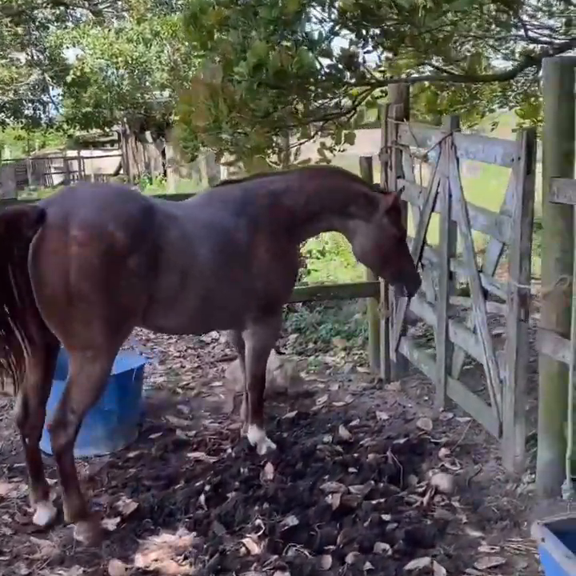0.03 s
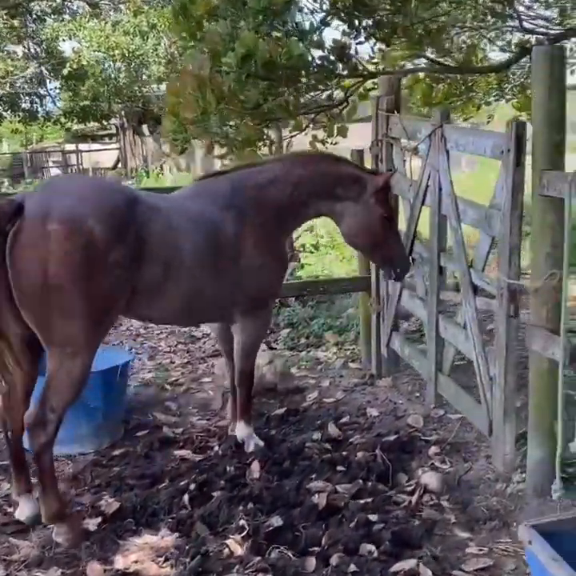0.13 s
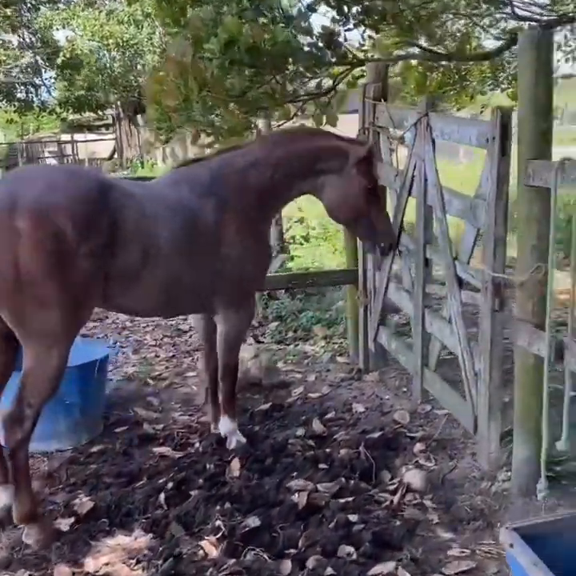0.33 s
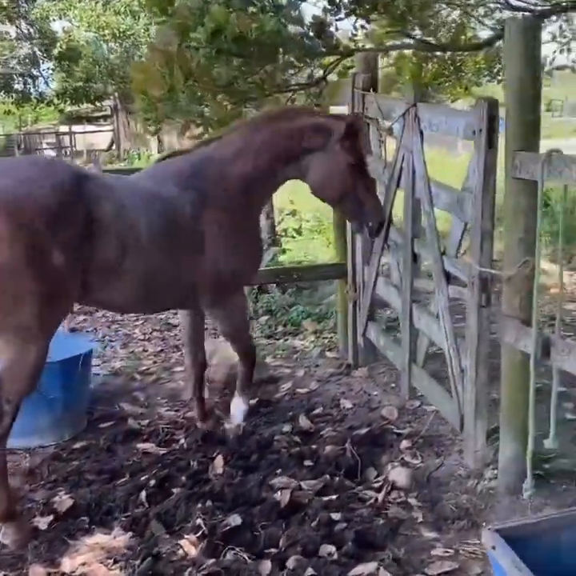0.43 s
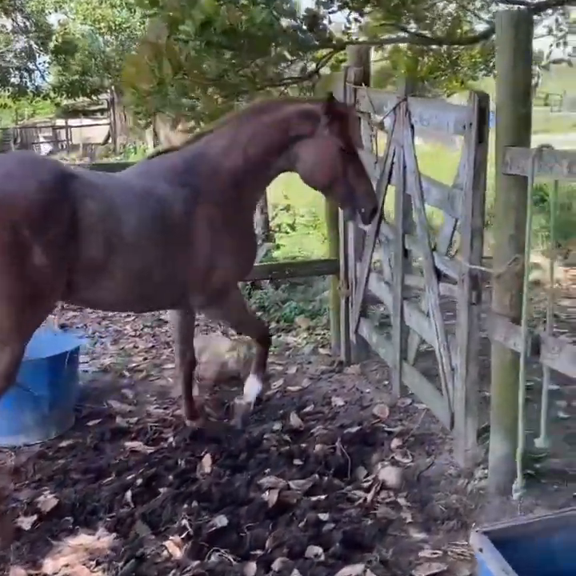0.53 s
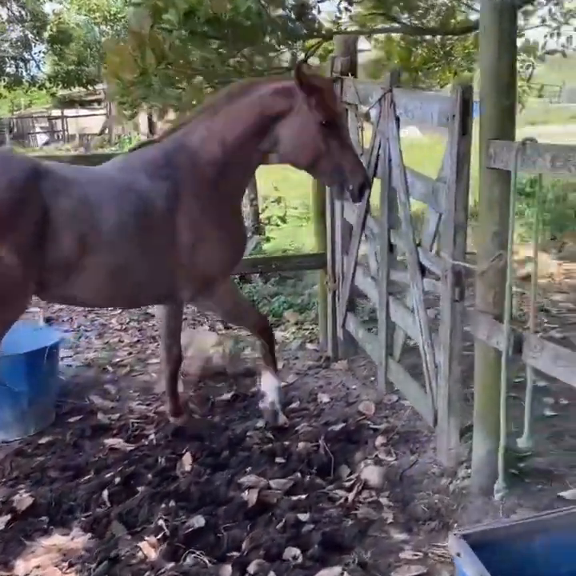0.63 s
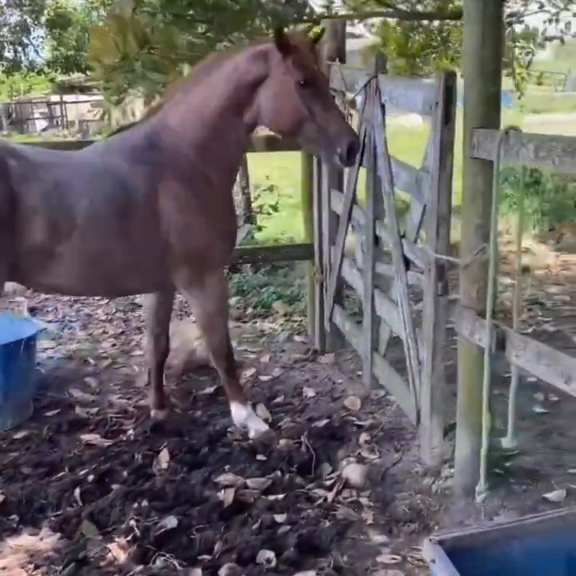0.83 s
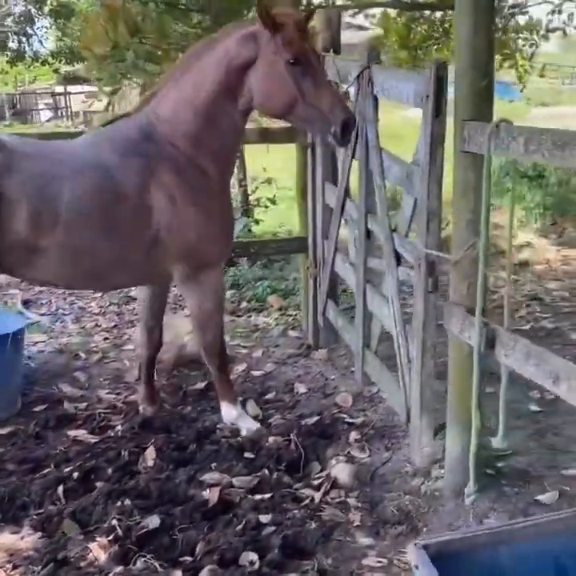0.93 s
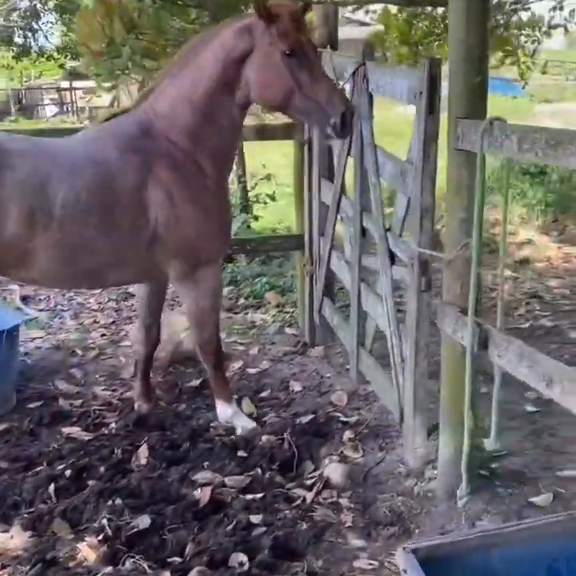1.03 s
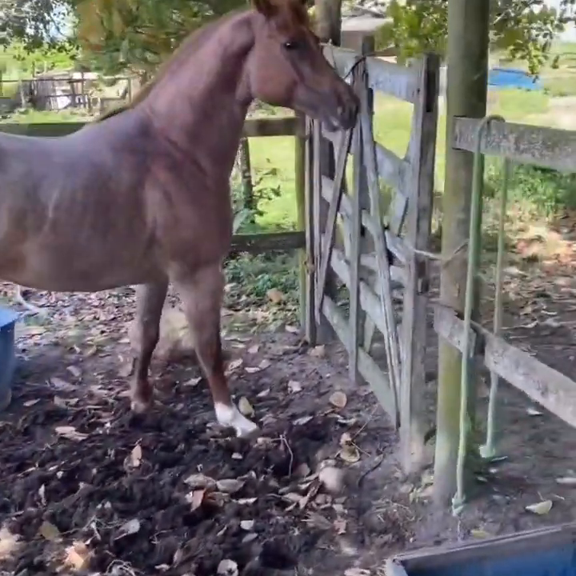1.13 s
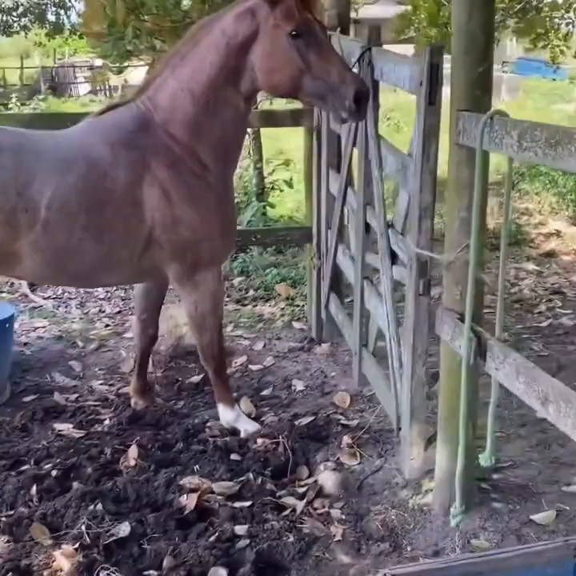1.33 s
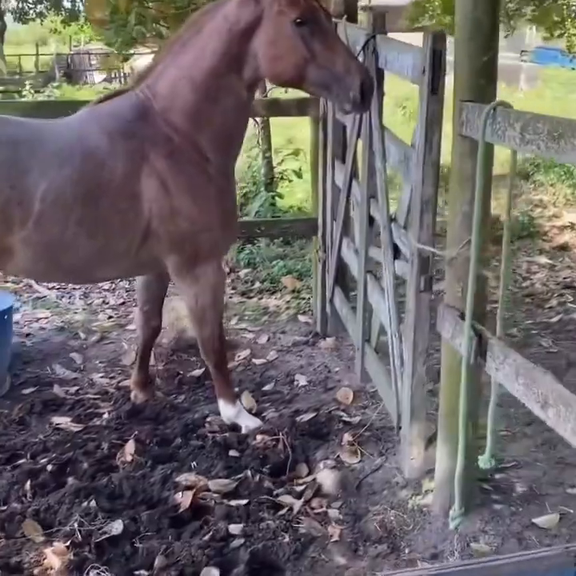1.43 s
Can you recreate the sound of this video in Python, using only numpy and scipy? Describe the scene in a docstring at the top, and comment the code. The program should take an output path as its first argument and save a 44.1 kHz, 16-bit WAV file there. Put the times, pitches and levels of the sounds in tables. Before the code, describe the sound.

A horse whinnies once close by, then steps on soft, leafy earth.

```python
"""A soft gust passes and a horse whinnies close by in a paddock, then steps on soft, leafy earth.
The call is a biphonation, a voice with two sources: a quavering low tone, and a whistle that climbs,
locks on the third harmonic and falls away as the call turns hoarse.
A wooden fence throws back short echoes; a light breeze rumbles underneath."""
import sys
import numpy as np
from scipy import signal
from scipy.fft import rfft, irfft
from scipy.io import wavfile
from scipy.ndimage import uniform_filter1d

SR = 44100
rng = np.random.default_rng(int(sys.argv[2]) if len(sys.argv) > 2 else 0)


def master(y):
    """Save y as 16-bit WAV."""
    cut = np.clip(np.atleast_2d(y).T, -1, 1)
    pcm = np.round(cut * 32767)  # scale
    wavfile.write(sys.argv[1], SR, pcm.astype(np.int16))


N = 66150
T = np.arange(N) / SR
VOICE_REF_DB, JITTER_HZ, OUTDOOR_WIDTH = -26, 205, 0.58

# Each row: time in seconds, low tone's pitch in Hz, relative levels of low tone and whistle in dB.
CALL = [(.115,430.8,-40,-71),(.14,477.4,-29.5,-32.5),(.19,482.9,-30.5,-36),(.235,535.3,-27.5,-21),(.3,481,-23,-32),(.337,535.8,-33,-18),(.38,543,-29.5,-17),(.405,494.6,-23,-22.5),(.43,482.7,-21.5,-22),(.45,545.7,-34,-24.5),(.515,560.3,-29,-22),(.535,495.4,-22,-27),(.585,518.6,-33,-29.5),(.635,511.2,-24,-23.5),(.66,464.6,-22.5,-38.5),(.683,478.7,-21.5,-37.5),(.7,475.5,-30,-37),(.72,491.3,-28,-22.5),(.752,479.7,-28,-33.5),(.78,437,-22,-36),(.805,369.9,-36.5,-45.5),(.83,392.4,-28.5,-27.5),(.855,451.9,-31,-57),(.895,443.4,-22,-43),(.922,385.7,-30.5,-28.5),(.955,243.7,-34.5,-80)]
# Each row: time in seconds, relative level of the overtones in dB.
OVERTONE_LEVELS = [(.11,-54),(.16,-27),(.24,-36.5),(.39,-30),(.49,-35.5),(.535,-28),(.64,-27),(.695,-32.5),(.73,-29),(.78,-32),(.84,-45),(.91,-34),(.96,-67)]


def from_db(db):
    """Decibels to amplitude ratio."""
    return 10 ** (np.asarray(db) / 20)


def curve(rows, column=1):
    """Linear interpolation of one column in time."""
    rows = np.array(rows)
    return np.interp(T, np.sort(rows[:, 0]), rows[:, column])


def envelope(rows, column=1, fade_s=0.0032):
    """Amplitude envelope from a dB column, with Gaussian fades outside its span."""
    outside = np.maximum(0, np.maximum(rows[0][0] - T, T - rows[-1][0]))
    return from_db(curve(rows, column)) * np.exp(-(2 * outside / fade_s) ** 2)


def gain_at(spectrum, hz):
    """Frequency response, interpolated in dB over log frequency."""
    freqs, db = np.transpose(spectrum)
    return from_db(np.interp(np.log(hz + 1), np.log(freqs), db))


def unit(x):
    """Normalisation to rms 1."""
    return x / np.sqrt(np.mean(x ** 2) + 1e-20)


def colour(x, spectrum):
    """Filtering by multiplication of spectra, normalised to rms 1."""
    hz = np.arange(N + 1) * SR / (2 * N)
    return unit(irfft(rfft(x, 2 * N) * gain_at(spectrum, hz))[..., :N])


def wobble(hz):
    """Random modulation: low-passed noise of rms 1."""
    return unit(signal.sosfilt(signal.butter(2, hz, fs=SR, output="sos"), rng.standard_normal(N)))


def pan(db):
    """Level difference of left over right, as two gains with a mean of 1."""
    gains = from_db(np.array([[db], [-db]]) / 2)
    return gains / gains.mean()


def noise(width):
    """Mid-side white noise; width is side over mid."""
    mid, side = rng.standard_normal((2, N))
    return mid + width * side * np.array([[1], [-1]])


def breeze(gust_s=0.046):
    """Wind noise: a steady rumble and hiss, with low gusts under Gaussian envelopes."""
    # Each row: time of the peak in seconds, level in dB.
    gusts = [(.008,-32),(.11,-40.5),(.42,-43)]
    # Each row of both: frequency in Hz, relative level in dB.
    gust_spectrum = [(25,-4.5),(60,14),(150,-12.5),(300,-53),(1000,-87.5)]
    steady_spectrum = [(25,-20.5),(60,-2),(180,-19.5),(350,-29.5),(1200,-30),(3000,-40.5),(7000,-50),(12500,-46)]
    swell = sum(from_db(db) * np.exp(-((T - peak) / gust_s) ** 2) for peak, db in gusts)
    rumble = swell * colour(noise(OUTDOOR_WIDTH), gust_spectrum)
    return rumble + from_db(-46) * colour(noise(OUTDOOR_WIDTH), steady_spectrum)


def fence(sound, onset_s=0.003, decay_s=0.0093):
    """Specular reflection off ground and gate; diffuse scattering of treble by boards and leaves."""
    # Each row: left and right delays in seconds, gain in dB.
    reflections = [(.0031,0.0047,-23.5),(.0074,.0061,-31)]
    specular = 0
    for *delays, db in reflections:
        delayed = [np.interp(T - delay, T, side) for delay, side in zip(delays, sound)]
        specular += from_db(db) * np.array(delayed)
    scatter = rng.standard_normal((2, N)) * (T > onset_s) * np.exp(-T / decay_s)
    scatter /= np.sqrt(np.sum(scatter ** 2, axis=1, keepdims=True))
    treble = signal.sosfilt(signal.butter(3, 2400, "high", fs=SR, output="sos"), sound)
    return specular + from_db(2.5) * signal.fftconvolve(treble, scatter, axes=1)[:, :N]


def hooves():
    """Impacts excite damped low oscillations; crushed earth and leaves give bursts of band noise."""
    # Each row: start in seconds, level in dB, frequency in Hz, 60 dB decay time in seconds.
    thuds = [(1.121,-32,59.8,0.49),(1.304,-43,103,0.15),(1.365,-37,81.7,0.51)]
    # Each row: peak time in seconds, level in dB, attack and decay in seconds, upper band edge in Hz.
    scuffs = [(1.118,-34,0.016,0.0064,327),(1.316,-34,0.0096,0.014,293),(1.361,-46,0.028,0.031,1180),(1.464,-54,0.024,0.012,6400)]
    out = np.zeros((2, N))
    for start, db, hz, t60 in thuds:
        age = np.maximum(T - start, 0)
        out += from_db(db) * np.sin(2 * np.pi * hz * age) * np.exp(-np.log(1000) * age / t60)
    for peak, db, attack, decay, top_hz in scuffs:
        band = signal.butter(2, [154, top_hz], "band", fs=SR, output="sos")
        burst = np.exp(-np.maximum((peak - T) / attack, (T - peak) / decay))
        out += from_db(db) * burst * unit(signal.sosfilt(band, noise(OUTDOOR_WIDTH)))
    return out


def breath(puffs, rough, shimmer):
    """Turbulence noise: air surges with each shake of the voice; after the call a faint hiss fades, and a short
    burst of noise sounds as a hoof scuffs through the leaves."""
    # Each row: frequency in Hz, relative level in dB.
    air_spectrum = [(900,-12.5),(1900,6.5),(4800,3),(6500,-8.5),(11500,-7),(13000,-18)]
    # Each row: time in seconds, level in dB.
    late_noise = [(.95,-53.5),(1.02,-66),(1.11,-45),(1.135,-69)]
    flow = from_db(-39.5 + 3.5 * rough) * (envelope(OVERTONE_LEVELS) / from_db(VOICE_REF_DB)) ** 0.4
    surge = from_db(curve(CALL, column=2) - VOICE_REF_DB)
    return (flow * surge * shimmer + envelope(late_noise)) * colour(noise(width=1) * puffs, air_spectrum)


def growl(puffs):
    """Source and filter: irregular puffs ring the throat's formants, each two resonators in series."""
    # Each row: time in seconds, level in dB.
    levels = [(.11,-43),(.15,-36.5),(.24,-62),(.6,-52),(.66,-44),(.73,-45.5),(.81,-30),(.86,-31.5),(.93,-33.5),(.97,-46.5),(1.12,-50)]
    # Each row: centre in Hz, half-bandwidth of one resonator in Hz, relative gain in dB.
    formants = [(236,120,-9),(462,71,3),(700,36,-0.5),(1056,73,-0.5),(1333,105,-1),(1662,106,-1.5),(2427,155,-7),(3647,114,-9.5),(4244,150,-13.5)]
    source = noise(width=0.57) * puffs * np.exp(0.44 * wobble(hz=112))
    out = 0
    for hz, half_width, db in formants:
        b, a = signal.iirpeak(hz, hz / (2 * half_width), fs=SR)
        out += from_db(db) * signal.lfilter(b, a, signal.lfilter(b, a, source))
    return unit(out) * envelope(levels) * pan(db=2)


def overtones(low_hz, whistle_hz, low_phase, whistle_phase, flicker_db=4.5):
    """Harmonics and combination tones of the two sources, filtered by the opening mouth."""
    # Each row of both: frequency in Hz, relative gain in dB.
    narrow_mouth = [(1720,11.5),(2000,10),(2350,-3),(3200,-6.5),(3750,-5),(4150,-1),(4550,-15.5),(4870,-1),(5400,-14.5),(9000,-32.5)]
    wide_mouth = [(1700,7.5),(2050,6.5),(2280,3),(2500,9),(2720,-6.5),(2960,8.5),(3400,-12),(4800,-9.5),(8000,-28)]
    # Each row: multiple of the low pitch, multiple of the whistle's pitch added to it.
    combinations = [(1,1),(0,2),(1,2),(0,3)]
    # Each entry: relative level of one combination in dB.
    combination_db = [5.5,4.5,2.5,1]
    opening = uniform_filter1d(1. * (T > 0.5167), size=400)

    def mouth(hz):
        return (1 - opening) * gain_at(narrow_mouth, hz) + opening * gain_at(wide_mouth, hz)

    out = 0
    for k in range(4, 25):
        flicker = from_db(flicker_db * wobble(hz=35.3))
        out += mouth(k * low_hz) * flicker * np.sin(k * low_phase + rng.uniform(0, 2 * np.pi))
    for (m, n), db in zip(combinations, combination_db):
        tone = np.sin(m * low_phase + n * whistle_phase)
        out += from_db(db) * mouth(m * low_hz + n * whistle_hz) * tone
    running_rms = np.sqrt(uniform_filter1d(out ** 2, size=500) + 1e-9)
    return from_db(1.5) * envelope(OVERTONE_LEVELS) * out / running_rms * pan(db=-1.5)


def low_tone(phase, left_lead_rad=0.55):
    """A fundamental and its second harmonic, which recedes as the tone grows louder."""
    fundamental = from_db(2.5) * np.sin([phase + left_lead_rad, phase]) * pan(db=4.5)
    excess_db = curve(CALL, column=2) - VOICE_REF_DB
    second = from_db(-13.5 - 1.25 * excess_db) * np.sin(2 * phase) * pan(db=7.5)
    return np.sqrt(2) * envelope(CALL, column=2) * (fundamental + second)


def whistle(phase, rough):
    """The upper source is a pure tone, raised in level by hoarseness."""
    level = from_db(2.5 + 4.5 * rough) * envelope(CALL, column=3)
    return np.sqrt(2) * level * np.sin(phase) * pan(db=3.5)


def pitches(rough, low_jitter=0.0346, whistle_jitter=0.037):
    """Mode locking: for stretches the whistle holds three times the low pitch."""
    # Each row: time in seconds, pitch of the free whistle in Hz.
    free_pitch = [(.115,771),(.148,1169),(.18,1276),(.205,1506),(.565,1580),(.595,1651),(.635,1647),(.67,1220),(.76,1372),(.795,1008),(.84,1032),(.88,1272),(.915,1032),(.95,893)]
    # Each row: start and end of a lock in seconds.
    locks = [(0.203,.565),(.705,.758)]
    low_hz = uniform_filter1d(curve(CALL), size=400) * (1 + low_jitter * rough * wobble(JITTER_HZ))
    free_hz = curve(free_pitch) * (1 + whistle_jitter * rough * wobble(JITTER_HZ))
    locked = uniform_filter1d(sum(1. * ((T > start) & (T < end)) for start, end in locks), size=300)
    return low_hz, locked * 3 * low_hz + (1 - locked) * free_hz


def whinny():
    """Biphonation: two sources sound at once, roughened by jitter in pitch and shimmer in amplitude."""
    # Each row: time in seconds, roughness from 0 to 1.
    hoarseness = [(.12,0.08),(.19,0.35),(.23,0.07),(.55,0.1),(.63,0.16),(.67,0.46),(.725,0),(.8,0.9),(.87,0.53),(.95,0.83)]
    rough = curve(hoarseness)
    low_hz, whistle_hz = pitches(rough)
    low_phase, whistle_phase = 2 * np.pi * np.cumsum([low_hz, whistle_hz], axis=1) / SR
    low_shimmer, whistle_shimmer, shimmer = [1 + 0.22 * rough * wobble(JITTER_HZ) for _ in range(3)]
    tones = low_tone(low_phase) * low_shimmer + whistle(whistle_phase, rough) * whistle_shimmer
    upper = overtones(low_hz, whistle_hz, low_phase, whistle_phase) * shimmer
    puffs = 1 + np.sin(low_phase) * (T < CALL[-1][0])  # one puff a cycle until the call ends
    return tones + upper + breath(puffs, rough, shimmer) + growl(puffs)


def scene():
    """Superposition of the horse, its echoes and the breeze."""
    horse = whinny() + hooves()
    return horse + fence(horse) + breeze()


def record(dry):
    """Band limiting: an elliptic low-pass cuts the top steeply."""
    return signal.sosfilt(signal.ellip(10, .2, 80, 12900, fs=SR, output="sos"), dry)


dry = scene()
out = record(dry)
master(out)
```